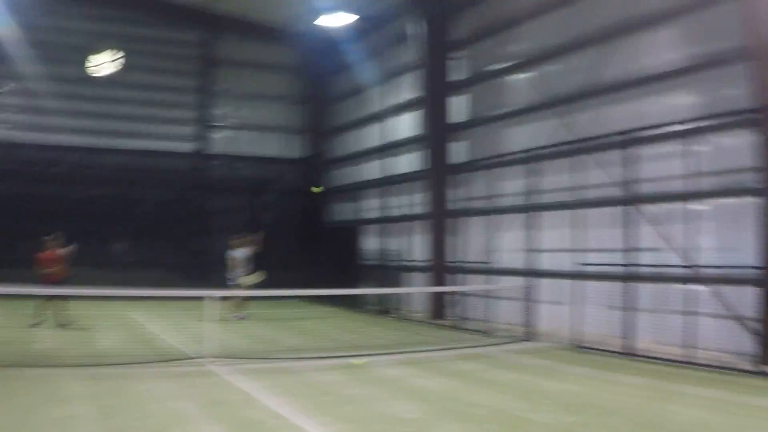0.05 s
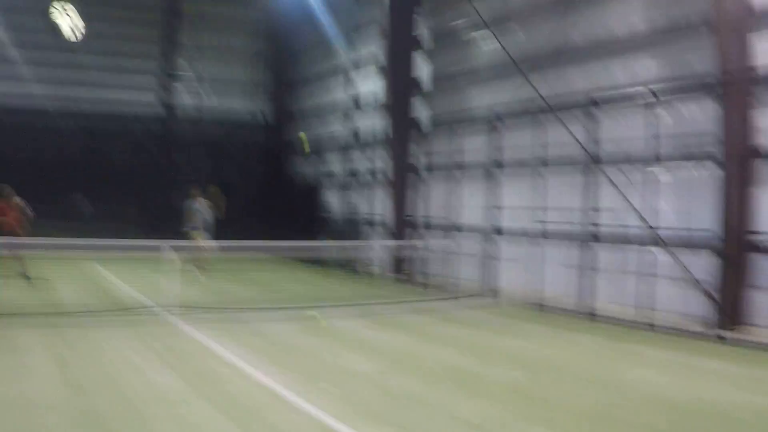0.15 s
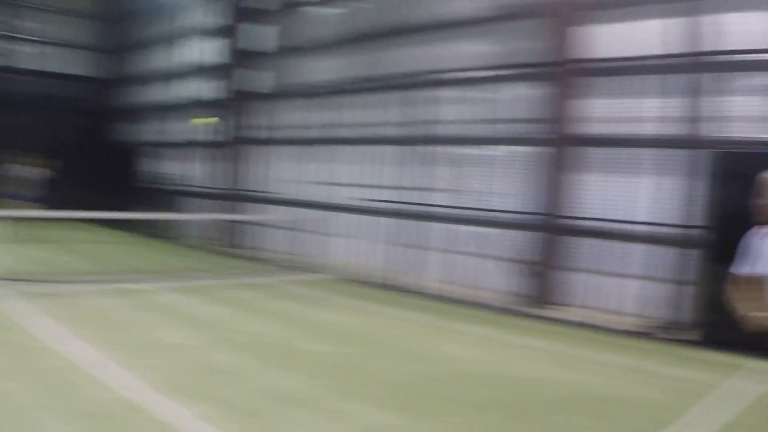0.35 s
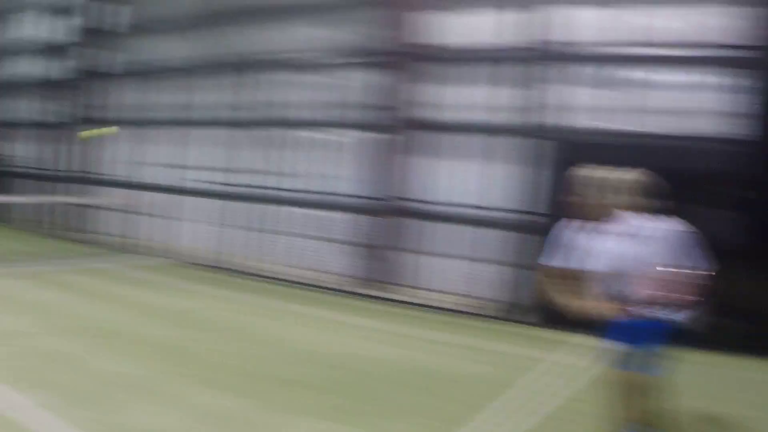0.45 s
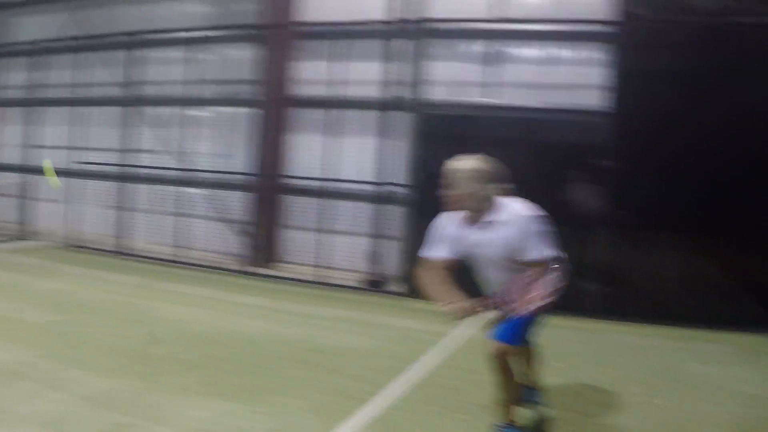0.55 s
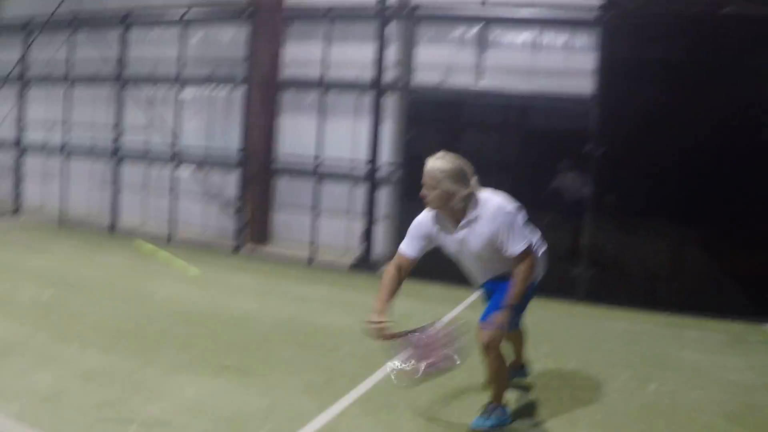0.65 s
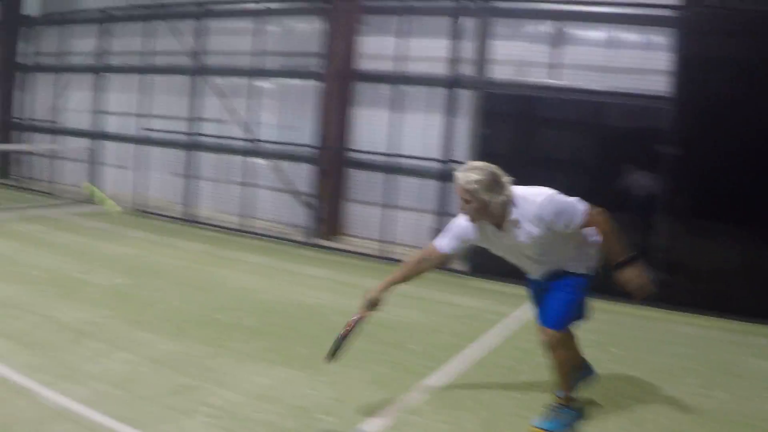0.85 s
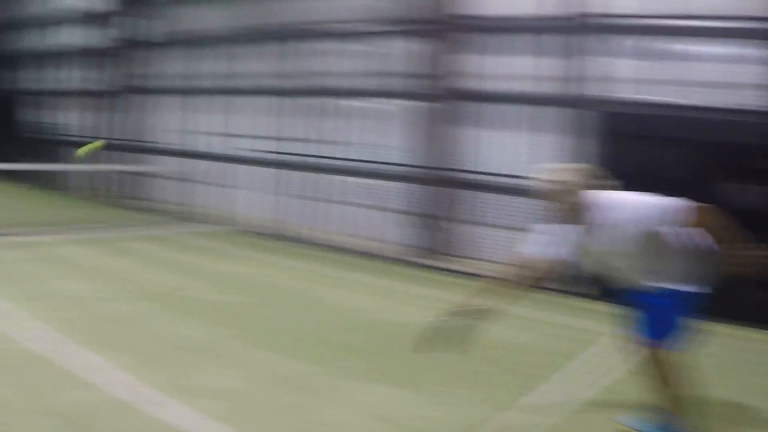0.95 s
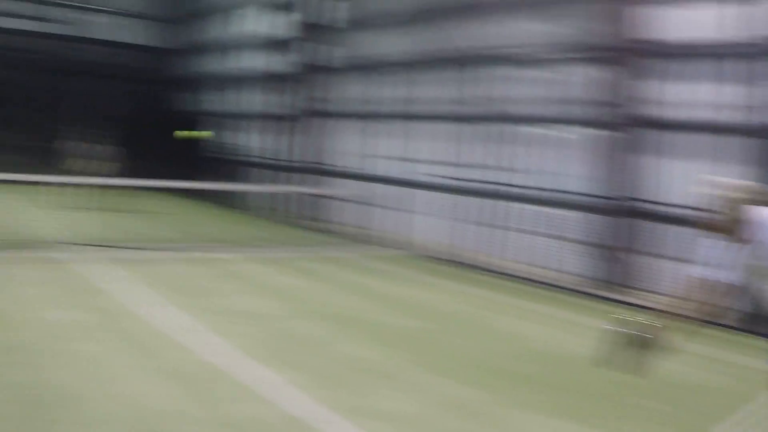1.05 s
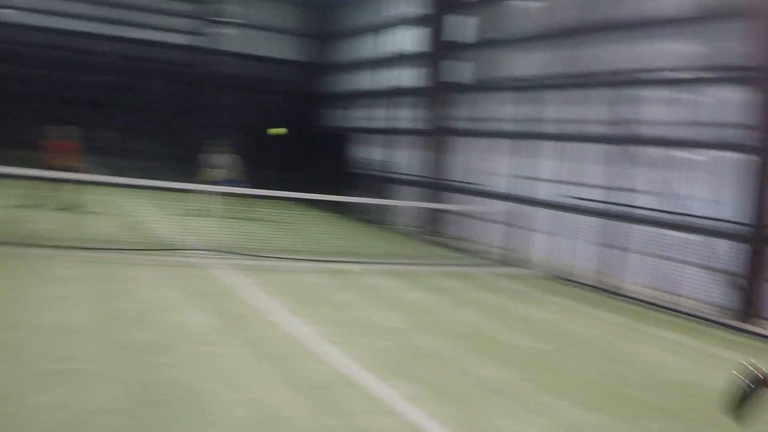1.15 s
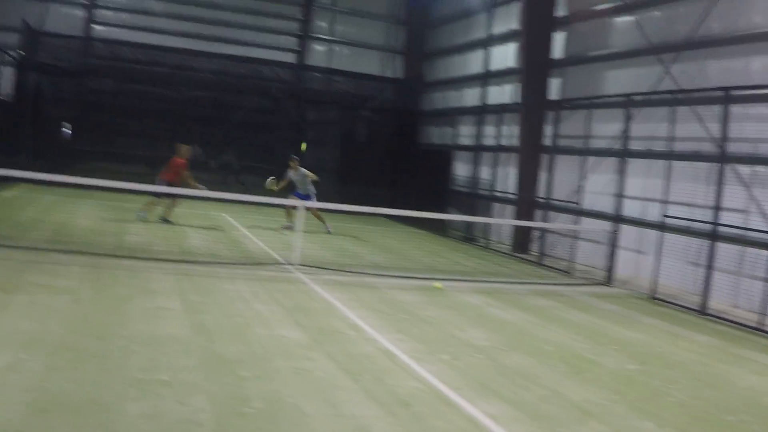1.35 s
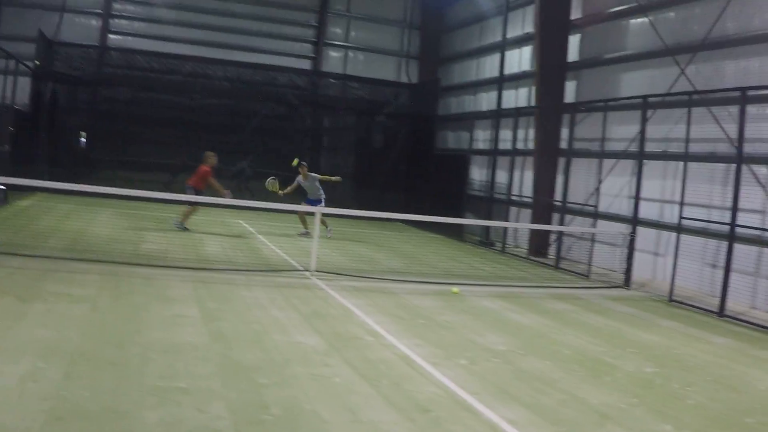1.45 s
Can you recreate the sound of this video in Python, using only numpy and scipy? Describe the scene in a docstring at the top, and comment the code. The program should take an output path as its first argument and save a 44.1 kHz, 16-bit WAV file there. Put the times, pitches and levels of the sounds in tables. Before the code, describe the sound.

One hollow, sharp racket hit on a ball rings through a steel indoor court with pulsing reverb

```python
"""The dying, pulsing tail of an earlier stroke comes first, with hiss, ticks and thumps of a hand-held camera;
then a racket strikes a ball in a steel-walled sports hall: a hollow crack, near echoes and a new pulsing tail.
Decaying sines make the racket's modes and the pings; shaped noise makes the crack, wall, roof and hall sound.
Low gliding cosines move the camera body, noise bursts are turf contacts, and a blip ticks once a frame."""
import sys
import numpy as np
from scipy import signal
from scipy.fft import rfft, irfft, next_fast_len
from scipy.io import wavfile

SR = 44100
rng = np.random.default_rng(int(sys.argv[2]) if len(sys.argv) > 2 else 0)


def bounce(signal):
    """Save signal as a 16-bit WAV file at the path given by the first command-line argument."""
    frames = np.transpose(np.atleast_2d(signal))
    limited = np.clip(frames, -1, 1)
    pcm = np.round(limited * 32767).astype(np.int16)
    wavfile.write(sys.argv[1], SR, pcm)


N = 66150

STROKE_S, STROKE_DB = 0.8253, -18  # time of the blow and reference level of its sounds


def amp(db):
    """Level to amplitude ratio: 20 dB is a factor of ten."""
    return 10 ** (np.asarray(db) / 20)


def along(points, hz):
    """Logarithmic frequency scale: interpolate (Hz, value) points along it."""
    f, value = np.transpose(points)
    return np.interp(np.log(hz + 1), np.log(f + 1), value)


def filtered(x, response):
    """Linear filtering: multiply the spectrum of x by a response of frequency."""
    size = next_fast_len(N + SR // 2)
    hz = np.fft.rfftfreq(size, 1 / SR)
    return irfft(rfft(x, size) * response(hz), size)[..., :N]


def noise(spectrum, port=1):
    """Spectral shaping: white noise coloured to rms 1, silent outside the spectrum's ends."""
    # resonances of the microphone's port in its housing: f/Hz, level/dB
    port_tone = [(1700, -2), (1950, 2.5), (2150, 6.5), (2450, 2), (2950, -2), (3650, -0.5), (4500, -0.5),
                 (5000, -4.5), (6800, -2), (8000, -8), (12000, -5)]

    def gain(f):
        inside = (f > spectrum[0][0]) * (f < spectrum[-1][0])
        return amp(along(spectrum, f) + port * along(port_tone, f)) * inside

    x = filtered(rng.standard_normal(N), gain)
    return x / np.std(x)


def burst(s, rise, t60):
    """Exponential relaxation: an envelope that swells from time s and decays by 60 dB in t60."""
    t = np.maximum(np.arange(N) / SR - s, 0)
    return (1 - np.exp(-t / rise)) * amp(-60 * t / t60)


def stroke():
    """Modal excitation: the blow rings damped modes, and near surfaces return it with altered spectrum."""
    # modes of racket and ball; the deeper ones come late, as the ball flattens and springs back:
    # f/Hz, level/dB, t60/s, swell/s, lag/s
    modes = [(166, -7.5, 0.037, 0.0022, 0.0022), (248, -0.5, 0.018, 0.00057, 0.0025),
             (302.7, -9.5, 0.075, 0.0019, 0.00267), (772, -6.5, 0.027, 0.00047, 0.00204),
             (1073, -5.5, 0.024, 0.0012, 0.00067), (1433, -1, 0.018, 0.00075, 0.00098),
             (2059, -10.5, 0.052, 0.0014, 0.00069), (2520, -4.5, 0.013, 0.00033, 0.00046),
             (3230, -4.5, 0.014, .0008, 0.0003), (3655, 2.5, 0.013, 0.00033, 0.00022),
             (4200, -0.5, 0.0093, 0.00063, 0.00022), (4473, -13, 0.016, 0.00089, 0.00029)]
    # echoes off turf, fence and walls:
    # delay/s, level below 500 Hz/dB, level above/dB, tilt of the part above about 1 kHz/(dB per octave)
    echoes = [(.0075, -8.5, -16, 2), (0.0167, -0.5, -13, -0.5), (.026, -3, -19, -1), (.0358, -32, -1.5, -6),
              (.0412, -10, -16, -13)]
    # colour of the crack: f/Hz, relative level/(dB per Hz)
    crack_tone = [(4800, -10), (6000, -17), (7500, 1), (10000, -12), (12000, -12.5), (15500, -28)]
    crack_db, crack_rise_s, crack_t60_s = -24.5, 0.00022, 0.013
    phase_spread = 0.94  # standard deviation of an echo's phase scramble, radians
    direct = (0, 0, 0.017, 0.011)  # same columns as the echoes

    t, out = np.arange(N) / SR, np.zeros(N)
    for delay, low_db, high_db, tilt_db in [direct] + echoes:
        for hz, mode_db, t60, swell, lag in modes:
            s = STROKE_S + delay + lag
            path_db = low_db if hz < 500 else high_db + tilt_db * np.log2(hz / 1000)
            phase = (delay > 0) * phase_spread * rng.normal()
            ringing = np.sin(2 * np.pi * hz * (t - s) + phase)
            out += amp(STROKE_DB + mode_db + path_db) * burst(s, swell, t60) * ringing
        # the crack takes the tilt of two octaves above 1 kHz
        level = amp(STROKE_DB + high_db + crack_db + 2 * tilt_db)
        out += level * burst(STROKE_S + delay, crack_rise_s, crack_t60_s) * noise(crack_tone)
    return out


def side_wall():
    """Scattering: the ribbed side wall returns the blow as a burst smeared in time."""
    # colour: f/Hz, relative level/(dB per Hz)
    wall_tone = [(400, 9.5), (700, -6), (1100, 5), (2100, -2.5), (4000, -8), (8000, -25), (13000, -33.5)]
    delay_s, db, rise_s, t60_s = 0.035, -5, 0.0031, 0.057
    return amp(STROKE_DB + db) * burst(STROKE_S + delay_s, rise_s, t60_s) * noise(wall_tone)


def roof():
    """Delayed reflection: the steel roof returns a late, bright splash."""
    # colour: f/Hz, relative level/(dB per Hz)
    roof_tone = [(3000, -17), (4500, -8), (6500, 4), (7600, 1), (9000, -17), (13000, -20)]
    delay_s, db, rise_s, t60_s = 0.056, -26, 0.044, 0.29
    return amp(STROKE_DB + db) * burst(STROKE_S + delay_s, rise_s, t60_s) * noise(roof_tone)


def pings():
    """Free vibration: brief damped sines, as of wire fence, strings or frame."""
    # t/s, level before the rise/dB, f/Hz, t60/s
    rings = [(.012, -40.5, 654, 0.11), (.1192, -44, 3650, 0.03), (0.1198, -40, 2330, 0.035),
             (0.8327, -25, 7100, 0.0046), (0.833, -43, 5800, 0.024), (0.8424, -40, 8000, 0.0068),
             (0.8535, -36, 5570, 0.009)]
    rise_s = 0.0005
    t, out = np.arange(N) / SR, np.zeros(N)
    for s, db, hz, t60 in rings:
        out += amp(db) * burst(s, rise_s, t60) * np.sin(2 * np.pi * hz * (t - s))
    return out


def hall():
    """Reverberation with flutter echo: each band has its own decay, pulsing at the end walls' round trip."""
    # stroke t/s, tail level before decay/dB
    tails = [(-.1, -36.5), (0.8257, -32.5)]
    # colour of each tail; the wall sheets favour a few low notes: f/Hz, relative level/(dB per Hz)
    earlier_tone = [(90, -8.5), (140, -14.5), (177, -6), (215, -14), (288, -10), (340, -14.5), (500, -23),
                    (650, -6.5), (880, -18.5), (1800, -20.5), (2300, -15.5), (4000, -24.5), (8000, -35),
                    (15000, -75)]
    later_tone = [(90, -7.5), (128, -2.5), (150, -7.5), (176, -3), (205, -9), (248, 3.5), (270, -7),
                  (296, -3.5), (400, -7.5), (527, -13), (600, -4.5), (1100, -8.5), (1800, -15), (4000, -16),
                  (7000, -28.5), (10000, -42), (15000, -60)]
    # reverberation time: f/Hz, t60/s
    decay = [(100, 1.89), (260, 2.045), (700, 0.42), (1840, 1.09), (4850, 0.8), (10000, 1.33)]
    # swing of the pulsing either way; negative dips on each return: f/Hz, depth/dB
    flutter = [(120, 1.5), (280, 4), (450, 3), (1000, -0.5), (2500, 1.5), (7000, 0)]
    # time constant of the build-up in each band: f/Hz, rise/s
    band_build = [(3000, 0.002), (5000, 0.046), (7000, 0.03), (12000, 0.019)]
    build_s, round_trip_s, frame = 0.014, 0.1169, 768

    out = np.zeros(N)
    for (s, db), tone in zip(tails, (earlier_tone, later_tone)):
        hz, t, spectra = signal.stft(noise(tone), SR, nperseg=frame)
        age = np.maximum(t - s, 0)
        pulse = np.cos(2 * np.pi * age / round_trip_s)
        decay_db = -60 * age / along(decay, hz)[:, None]
        flutter_db = along(flutter, hz)[:, None] * pulse
        build = 1 - np.exp(-age / along(band_build, hz)[:, None])
        shaped = spectra * amp(decay_db + flutter_db) * build
        tail = signal.istft(shaped, SR, nperseg=frame)[1][:N]
        fill = np.clip((np.arange(N) / SR - s) / build_s, 0, 1) ** 2
        out += amp(db) * tail * fill
    return out


def hand():
    """Structure-borne sound: low swings of the camera body, handling rumble and two housing clicks."""
    # thumps: centre t/s, level/dB, f at centre/Hz, glide/(Hz/s), rise/s, fall/s
    thumps = [(.042, -24.5, 27.8, -6, 0.016, 0.021), (.092, -38, 27.6, -3, 0.028, 0.011),
              (0.163, -29, 27.2, -9, 0.02, 0.036), (.253, -10.5, 25.9, -130, 0.019, 0.054),
              (0.344, -35.5, 29.2, 22, 0.011, 0.1), (.578, -30.5, 30.3, 6, 0.043, 0.066),
              (1.161, -38, 34.8, 0, .015, 0.031), (1.332, -48, 27, -7, .025, 0.021),
              (1.455, -43, 33, 22, 0.013, 0.029)]
    # handling rumble: t/s, level/dB
    rumble = [(0.0, -43.5), (0.212, -41), (0.338, -39.5), (0.446, -46.5), (0.664, -39.5), (0.792, -42.5),
              (0.94, -47), (1.206, -47), (1.336, -49), (1.5, -56)]
    # rumble colour: f/Hz, relative level/(dB per Hz)
    rumble_tone = [(10, -13), (28, 18), (40, -31.5), (55, -2), (80, -52), (120, -50)]
    # clicks of the housing under the grip: t/s, level before the rise/dB
    creaks = [(0.2347, -46), (0.2394, -45.5)]
    # click colour: f/Hz, relative level/(dB per Hz)
    creak_tone = [(1000, -21), (4000, -1), (7000, -6), (12500, -8), (15500, -14)]
    creak_rise_s, creak_t60_s = 0.00026, 0.0071

    t = np.arange(N) / SR
    out = amp(np.interp(t, *np.transpose(rumble))) * noise(rumble_tone)
    for s, db, hz, glide, rise, fall in thumps:
        u = t - s
        swell = np.exp(-(u / np.where(u < 0, rise, fall)) ** 2)
        out += amp(db) * swell * np.cos(2 * np.pi * (hz * u + glide * u * u / 2))
    clicks = sum(amp(db) * burst(s, creak_rise_s, creak_t60_s) for s, db in creaks)
    return out + noise(creak_tone, port=0) * clicks  # the clicks bypass the port


def turf():
    """Damped impact and friction: dull touches of ball and feet, and one drag of a shoe."""
    # soft contacts: t/s, level before the rise/dB, rise/s, t60/s, tilt about 1 kHz/(dB per octave)
    bounces = [(0.151, -45.5, 0.0017, 0.033, -7.5), (0.222, -44, 0.0072, 0.11, -4.5),
               (0.383, -51.5, 0.0016, 0.025, 1), (.688, -54, 0.0036, 0.054, -2),
               (0.698, -47, 0.0024, 0.036, -1), (1.142, -44.5, .015, 0.16, 5.5)]
    # contact colour before the tilt: f/Hz, relative level/(dB per Hz)
    bounce_tone = [(200, 1), (500, 0), (900, 11), (2200, -2), (4000, -17), (8000, -50)]
    # colour of the shoe drag: f/Hz, relative level/(dB per Hz)
    scuff_tone = [(600, -16.5), (1700, 2), (2300, 12), (3000, 16), (4500, 9), (8000, 7)]
    scuff_s, scuff_db, scuff_rise_s, scuff_t60_s = 0.457, -62, 0.02, 1

    out = amp(scuff_db) * burst(scuff_s, scuff_rise_s, scuff_t60_s) * noise(scuff_tone)
    for s, db, rise, t60, tilt_db in bounces:
        tilted = [(f, level + tilt_db * np.log2(f / 1000)) for f, level in bounce_tone]
        out += amp(db) * burst(s, rise, t60) * noise(tilted)
    return out


def camera():
    """Stationary noise and periodic pulses: steady hiss, and a short high blip with every frame."""
    # hiss of hall and microphone: f/Hz, relative level/(dB per Hz)
    air_tone = [(60, 6.5), (130, -8), (200, -8.5), (300, -14), (420, -18.5), (1000, -23), (2200, -26),
                (4000, -28), (8700, -29), (15600, -37.5)]
    air_db = -57
    first_frame_s, frame_hz = 0.004, 29.97
    tick_hz, tick_db, tick_s = 8560, -68.5, 0.0029  # tick_s: from the peak to 1/e

    t = np.arange(N) / SR
    cycle = ((t - first_frame_s) * frame_hz + 0.5) % 1 - 0.5  # frames from the nearest blip
    ticks = np.exp(-(cycle / frame_hz / tick_s) ** 2) * np.sin(2 * np.pi * tick_hz * t)
    return amp(air_db) * noise(air_tone) + amp(tick_db) * ticks


def scene():
    """Superposition: the pressures of all sources add into one channel."""
    blow = stroke() + side_wall() + roof() + pings()
    return (blow + hall() + hand() + turf() + camera())[None]


def record(dry):
    """Band limitation: the camera keeps only what lies below its upper limit."""
    top_hz = 15600
    return filtered(dry, lambda hz: hz < top_hz)


dry = scene()
out = record(dry)
bounce(out)
```